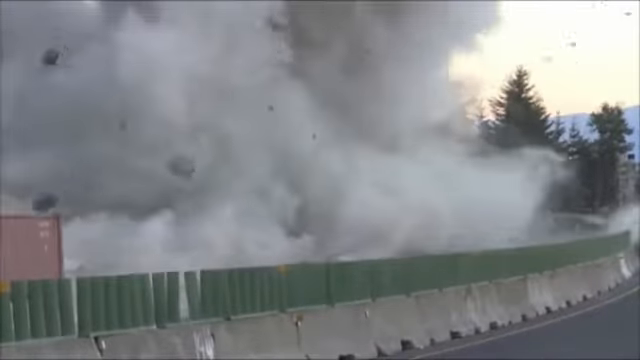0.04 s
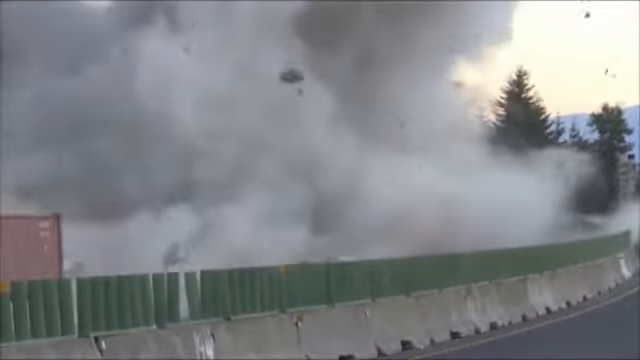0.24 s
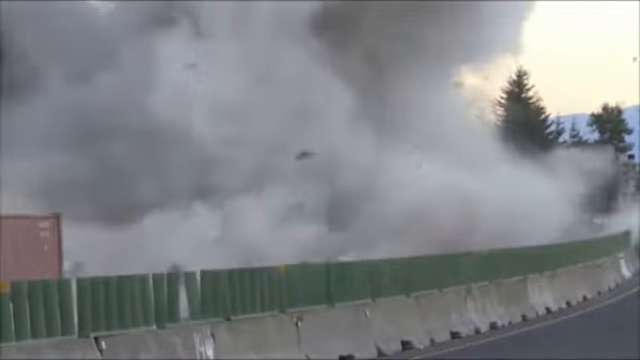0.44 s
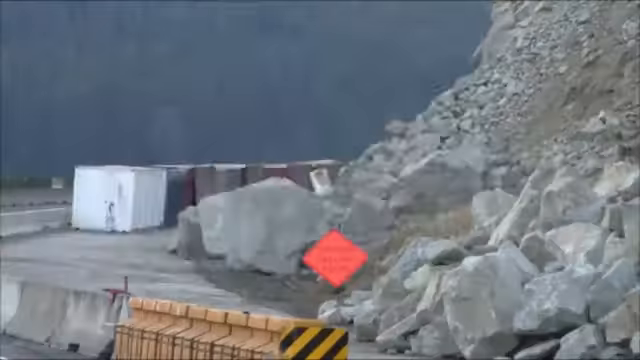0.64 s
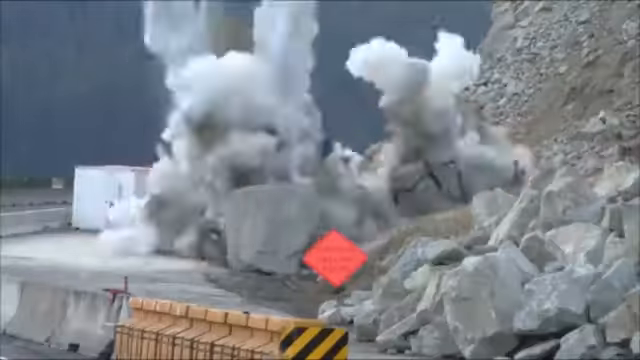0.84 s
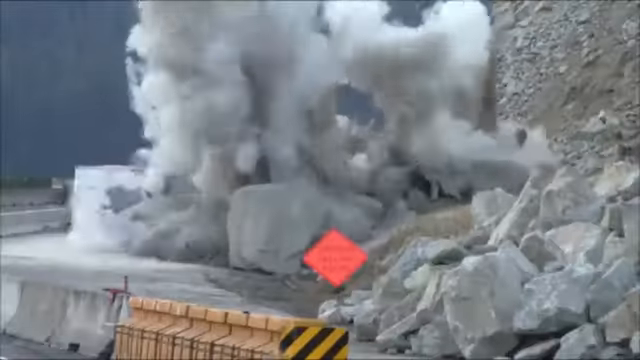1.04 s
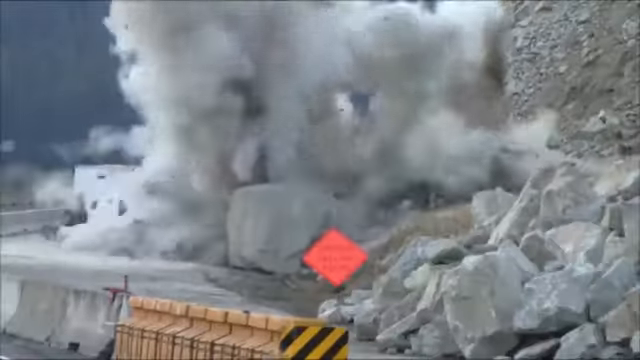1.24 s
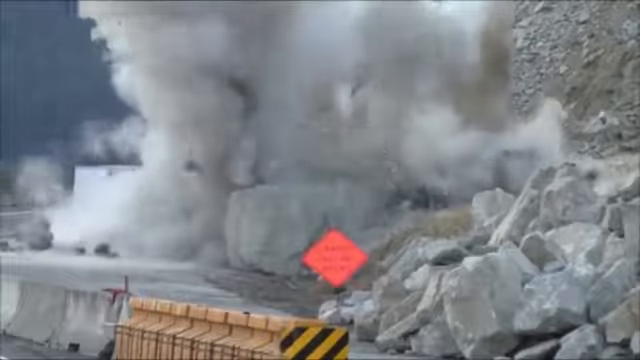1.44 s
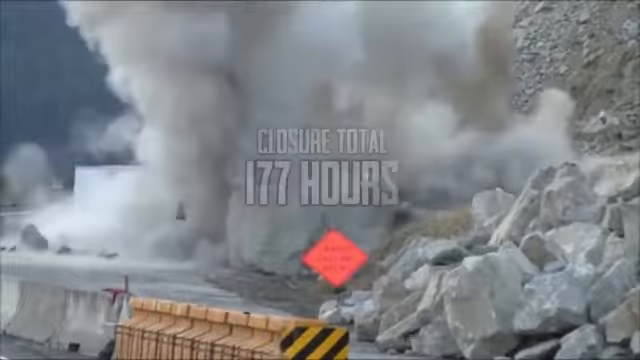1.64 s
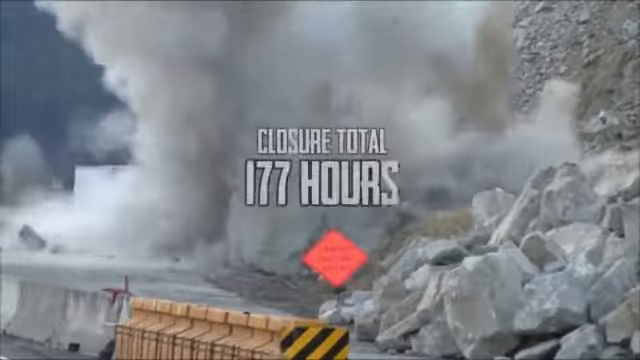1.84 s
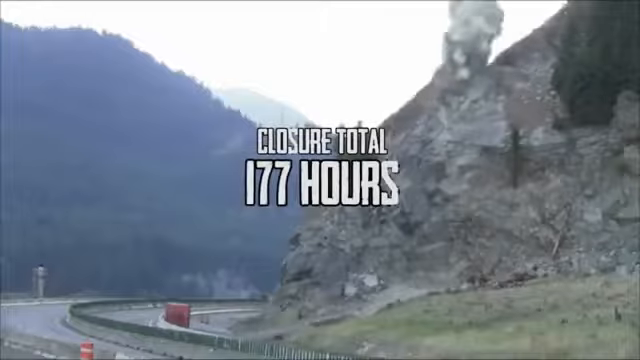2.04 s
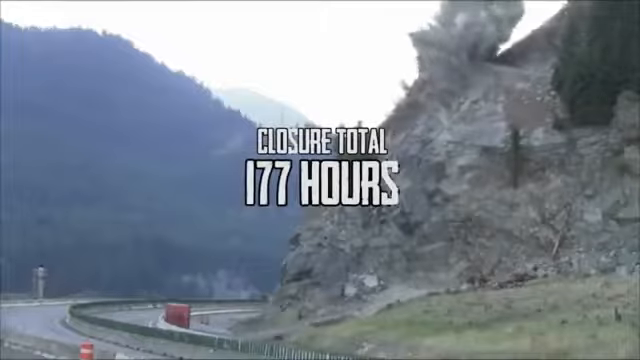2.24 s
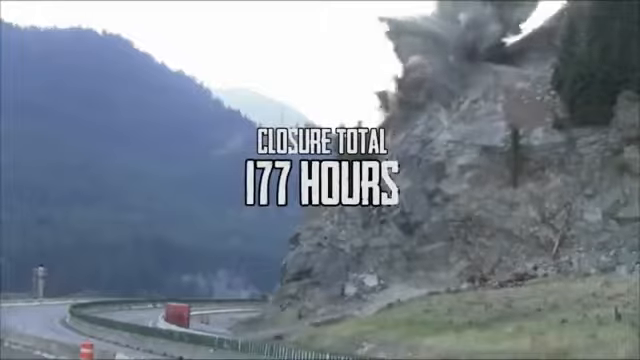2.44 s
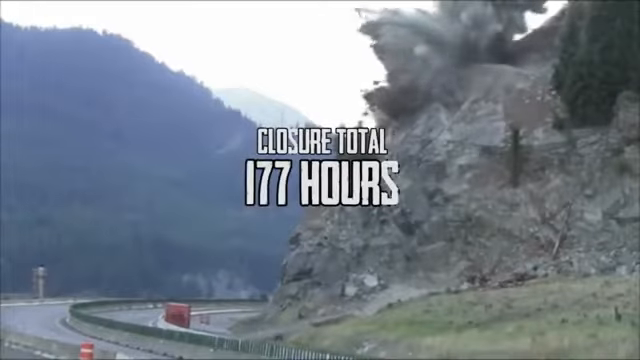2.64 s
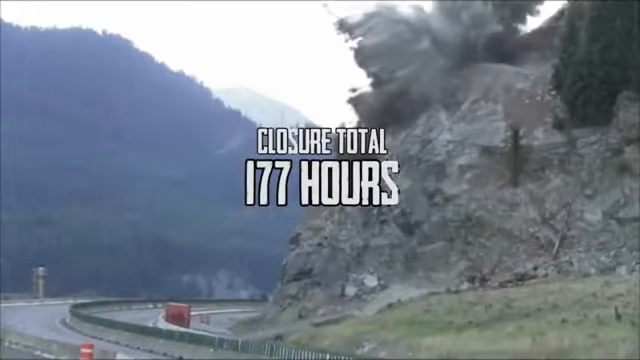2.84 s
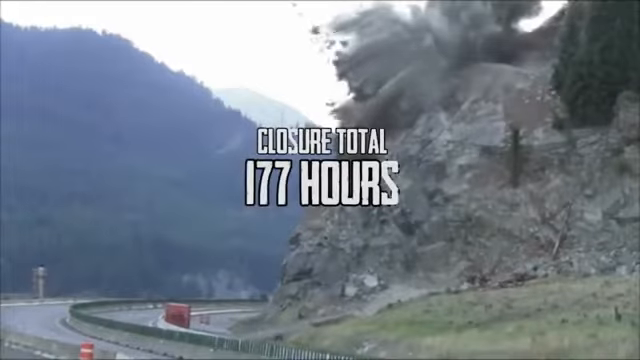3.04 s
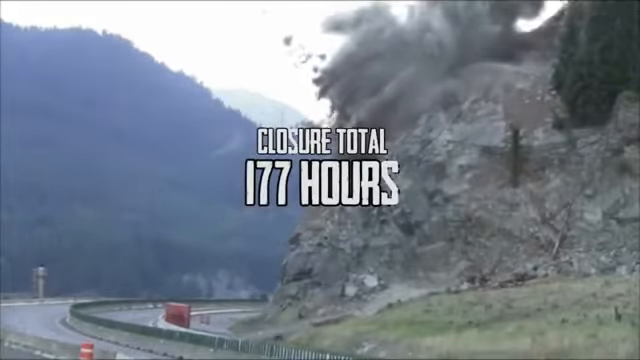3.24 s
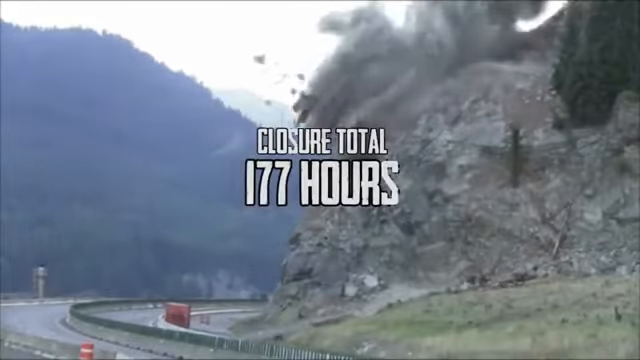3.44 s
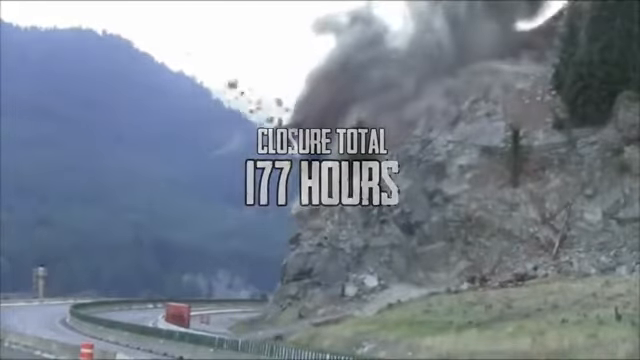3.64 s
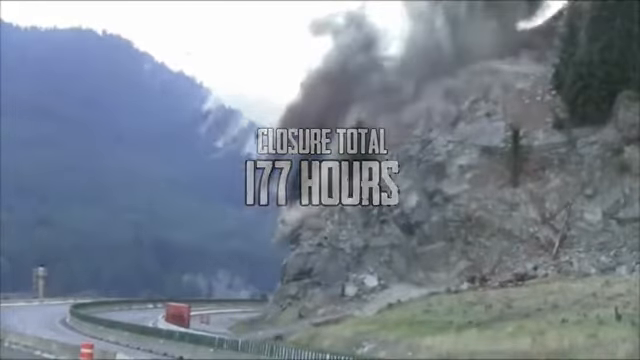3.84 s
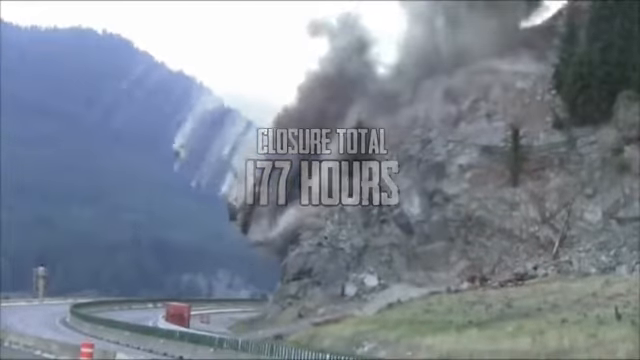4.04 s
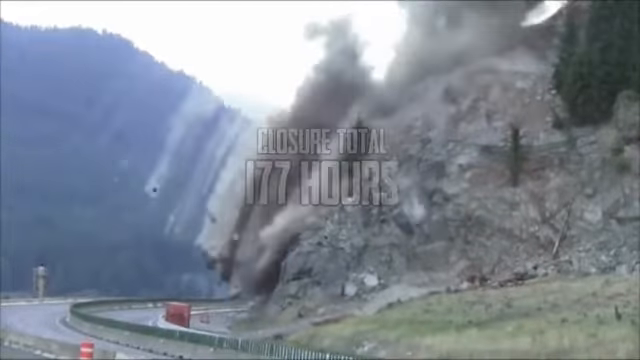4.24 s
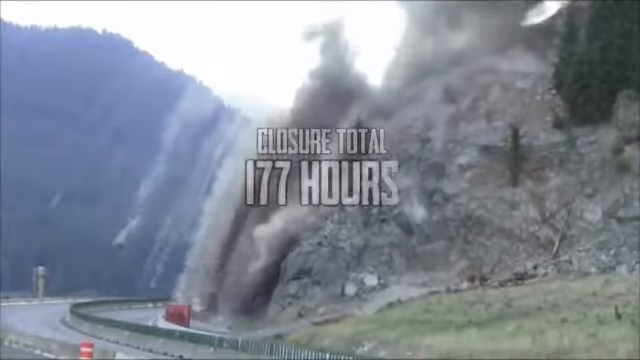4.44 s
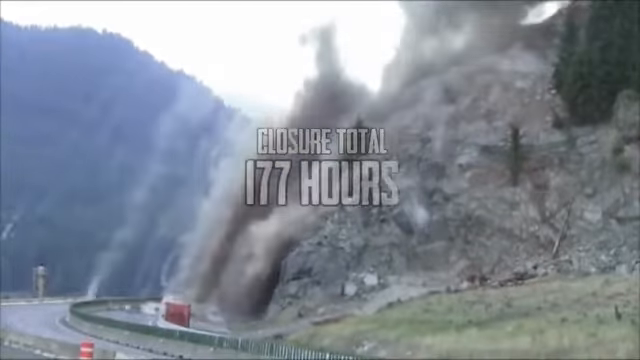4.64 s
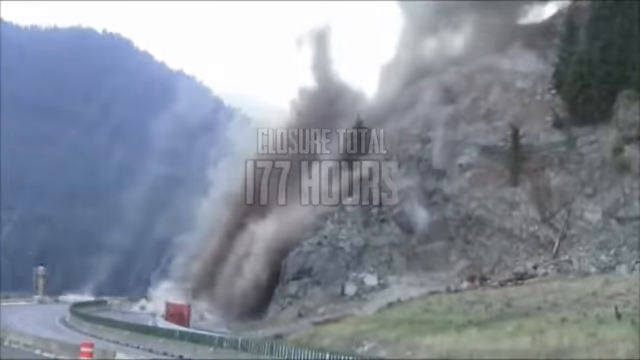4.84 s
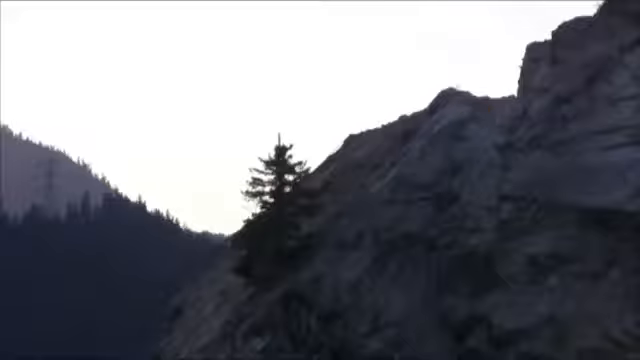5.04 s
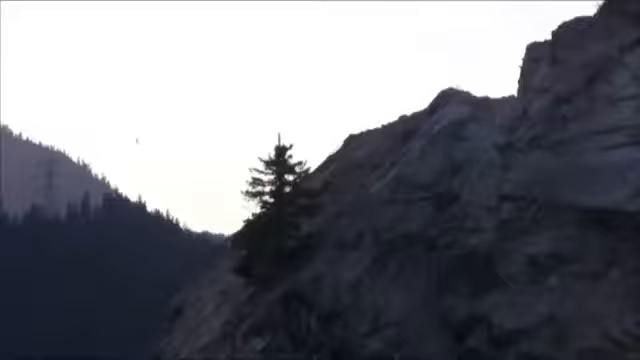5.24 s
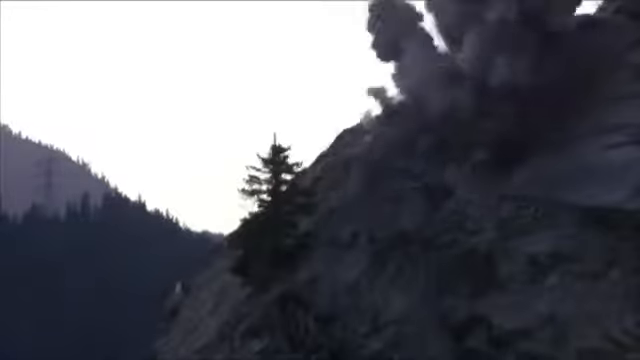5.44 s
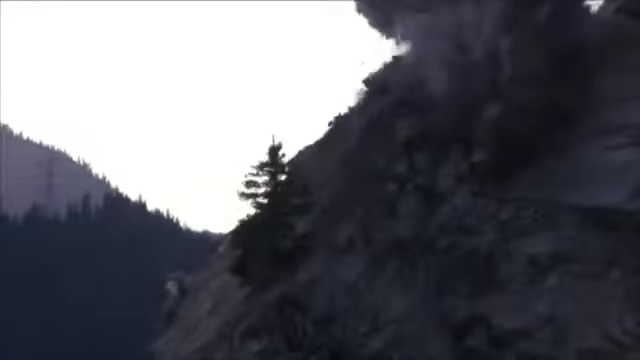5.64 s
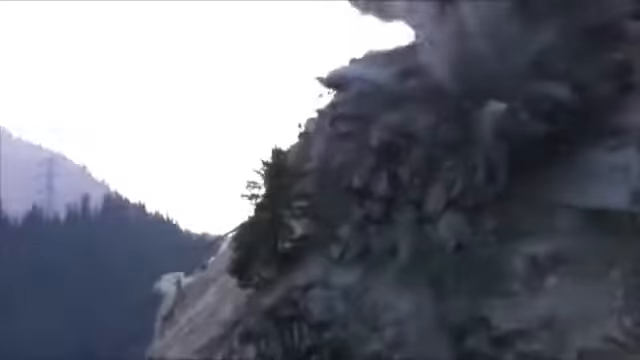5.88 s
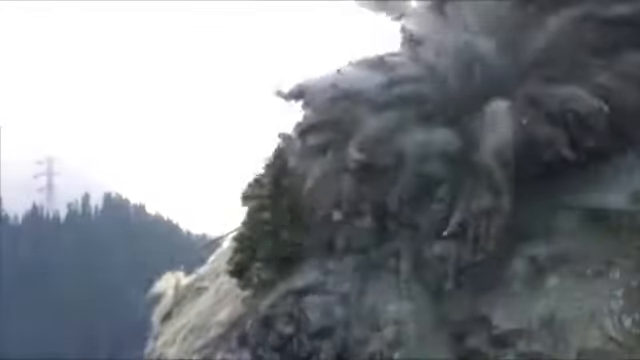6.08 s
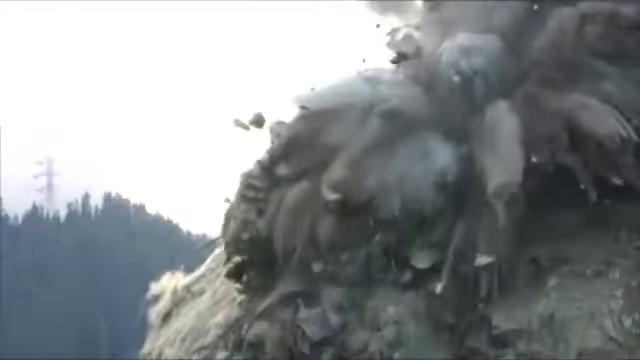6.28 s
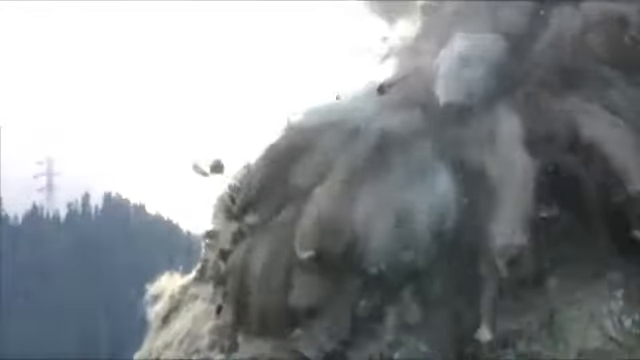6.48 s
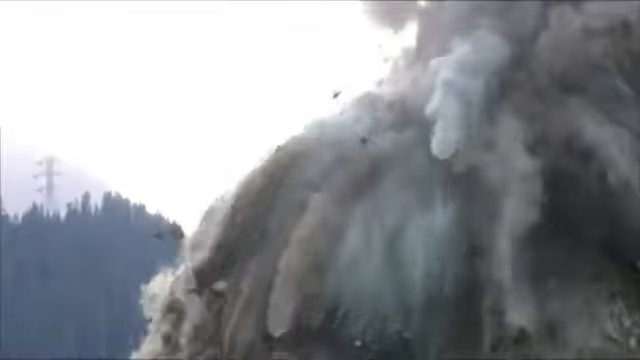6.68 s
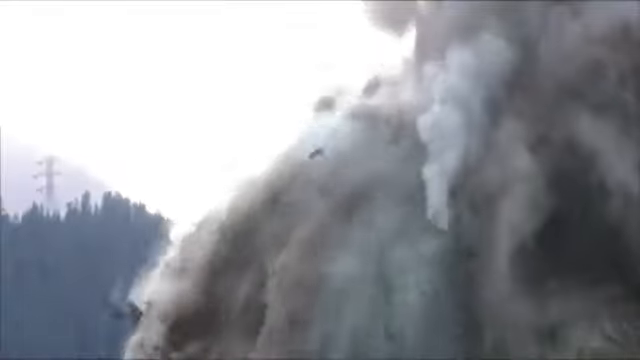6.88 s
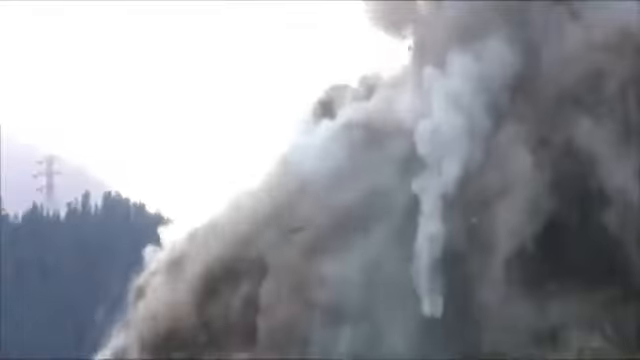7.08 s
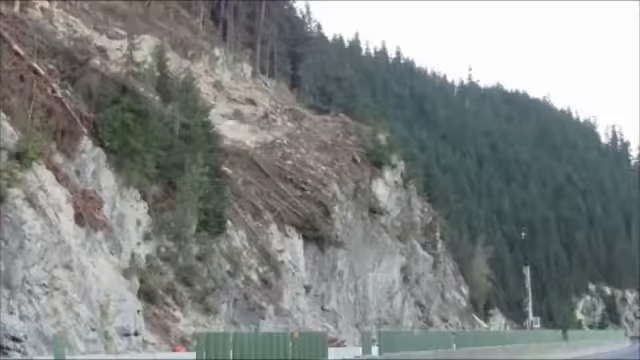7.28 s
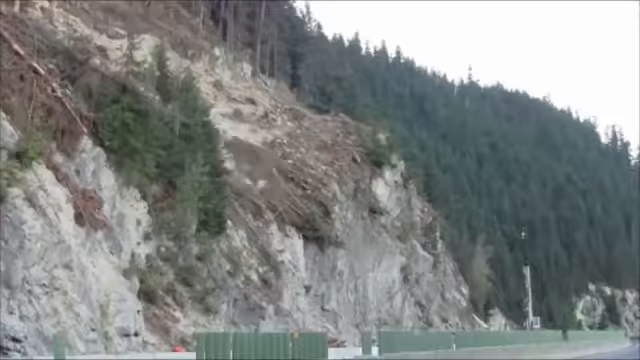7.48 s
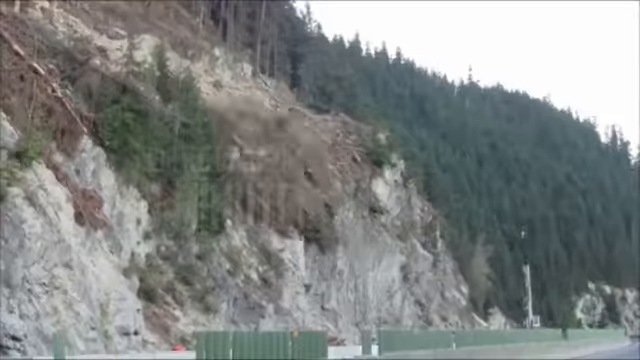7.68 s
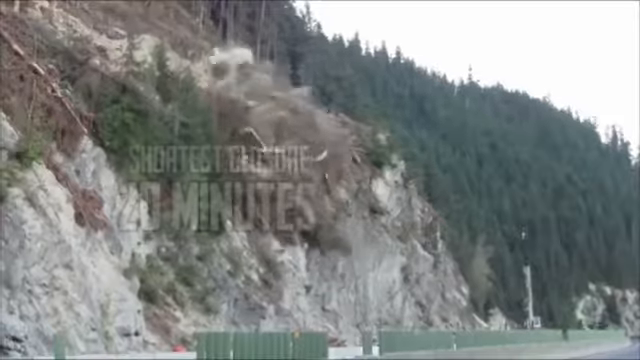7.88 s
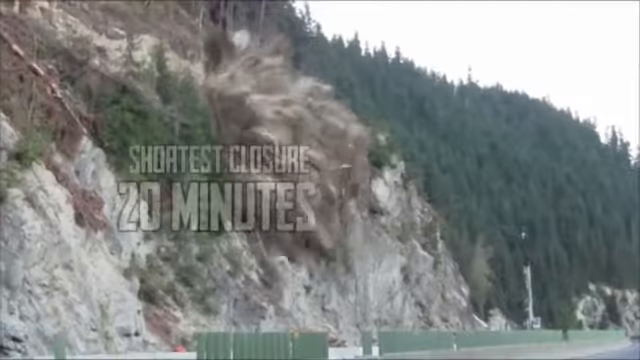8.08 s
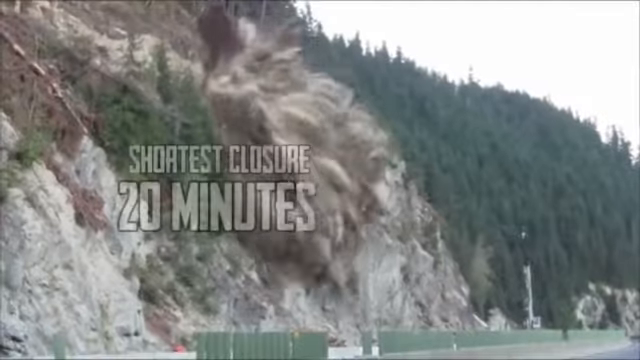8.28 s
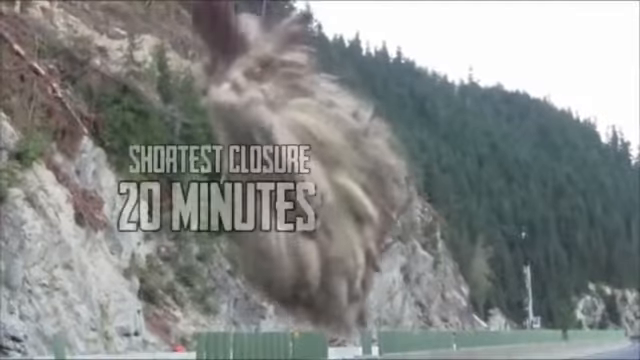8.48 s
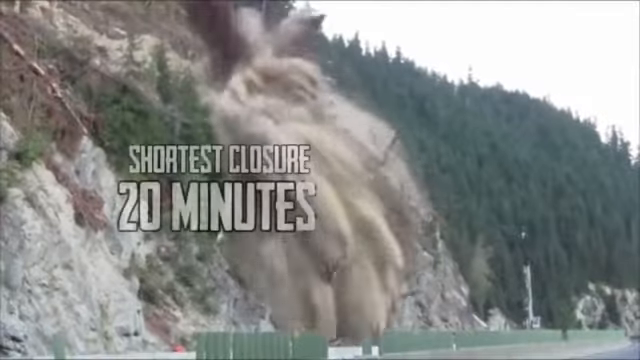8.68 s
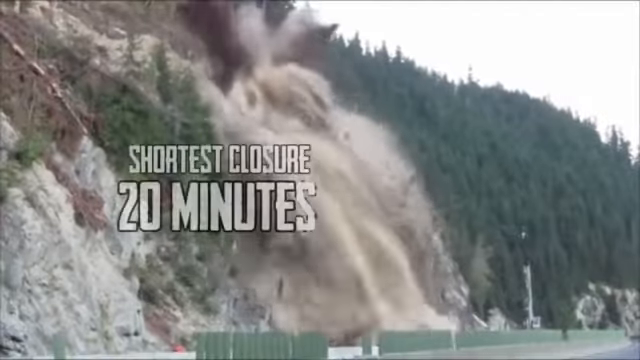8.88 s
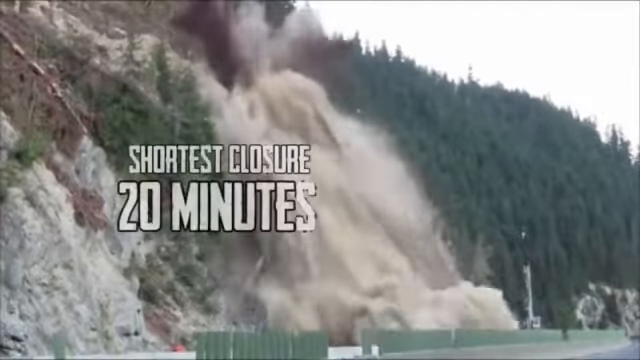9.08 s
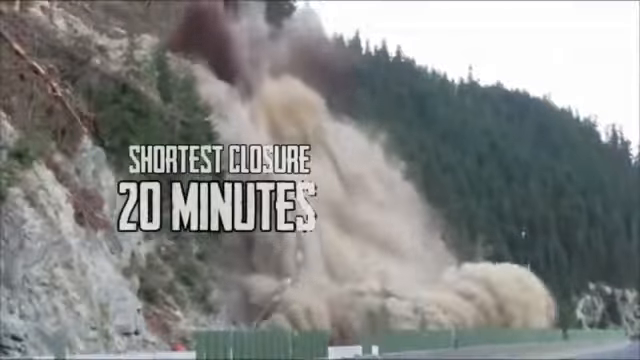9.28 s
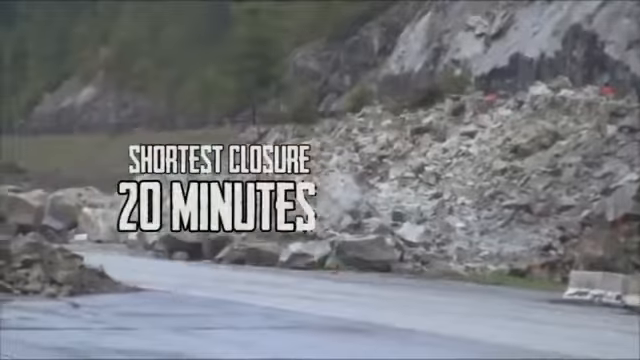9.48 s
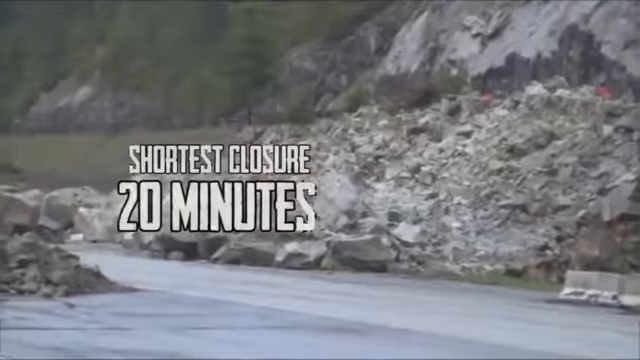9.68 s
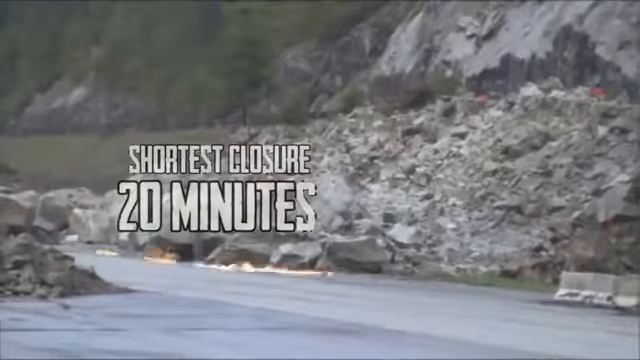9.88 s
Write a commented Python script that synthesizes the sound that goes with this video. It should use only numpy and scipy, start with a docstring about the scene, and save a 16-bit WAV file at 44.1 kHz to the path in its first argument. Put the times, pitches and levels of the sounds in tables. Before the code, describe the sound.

Rubble and gravel pour down from the start, with a few sharp stone hits. At 0.8 seconds hard cracks ring out, a boom follows at 1.1, and rocks tumble, fading by 2. A rapid row of detonator caps crackles from 2.1, running into booms and thuds from 2.5 to 2.8. Falling rock then swells, with lone knocks, until about 5.1. A brief lull holds a faint distant engine, leaves and one tiny high bird chirp. Caps crackle again at 5.4, the sharpest crack and a boom hit at 5.8, and boulders pour down until 7.2. Another row of caps runs from 7.35 to 7.7, followed by soft thuds and a growing gritty slide, with heavy dull blows around 9.2. The slide eases, and a last crack comes at 9.9. Everything is heard outdoors on a small stereo microphone with thin bass and rounded peaks.

```python
"""Rock blasts on highway slopes, cut one after another. Timed caps crack in quick rows and bounce off
the ground, the charges boom, then boulders, rocks, gravel and grit pour down in clumps and lone knocks.
Between blasts the valley is quiet but for a distant idling engine, leaves, a hum and a bird.
Heard in the open on a small stereo camera microphone that is thin in the bass and rounds the peaks."""
import sys
import numpy as np
from scipy import signal
from scipy.fft import rfft, irfft
from scipy.io import wavfile
from scipy.ndimage import uniform_filter1d

SR = 44100
rng = np.random.default_rng(int(sys.argv[2]) if len(sys.argv) > 2 else 0)


def digitize_waveform(pressure):
    """Quantize a signal to 16-bit integers and store it at the path in sys.argv[1].

    Rows of a 2-D input are taken as channels; values are limited to [-1, 1].
    """
    field = np.atleast_2d(pressure).T
    bounded = np.clip(field, -1, 1)
    quanta = np.round(bounded * 32767).astype(np.int16)
    wavfile.write(sys.argv[1], SR, quanta)


N = 437472

# Lone cracks of the blasts on the slope: start_s, level_db, pitch_hz, treble_db
CRACKS = [(.8036, -13, 2230, -25), (.8056, -1.5, 1830, -28), (.8115, -34, 5000, -6), (.8193, -5, 1970, -12),
          (.828, -23, 4000, -5), (.836, -16, 800, -30), (.926, -13, 3000, -27), (1.0338, -14, 2000, -27),
          (1.0395, -19, 3200, -20), (1.0353, -6, 2200, -37), (1.0375, -11, 2600, -33),
          (1.0497, -7, 1800, -33), (1.052, -17, 2200, -33), (1.089, -1.5, 1290, -12),
          (1.1025, -9, 1680, -12), (2.4708, -5, 1050, -10), (2.4743, -18, 1240, -19),
          (2.4783, -2, 980, -25), (2.5064, -6, 980, -26), (2.5824, -6, 1020, -16), (2.7312, -4.5, 900, -21),
          (2.7642, -10, 1080, -11), (5.7817, 5.5, 764, -17), (5.849, -10, 1200, -13),
          (9.9053, -3.5, 1510, -9)]


def blast_cracks():
    """Sharp pressure fronts that die within a cycle and reach the microphone without bass."""
    return shots(CRACKS, gain_db=3.5, turns=0.35, edge_db=-2.5, spit_s=0.00017,
                 scatter_db=-12.5, thin_hz=610)


# Timed caps on the slope, one a hole, fired along the rows: start_s, level_db, pitch_hz
CAPS = [(2.1083, -18.5, 850), (2.1235, -18, 850), (2.1359, -19, 980), (2.1492, -11, 930),
        (2.1625, -22, 800), (2.1739, -15.5, 950), (2.1885, -15, 1000), (2.2003, -18, 1380),
        (2.2123, -14, 900), (2.227, -18, 900), (2.2384, -17, 1270), (2.2482, -11, 1940),
        (2.2575, -13, 1660), (2.2632, -17, 1300), (2.268, -16, 1630), (2.2717, -9, 1650),
        (2.2798, -10.5, 2220), (2.284, -9, 2140), (2.2911, -10, 2780), (2.3038, -7, 2320),
        (2.3183, -12.5, 1500), (2.3299, -10, 1760), (2.3425, -12, 1500), (2.3538, -9.5, 1730),
        (2.3673, -10, 1880), (2.3778, -12, 1960), (2.3905, -26, 900), (2.403, -10, 1950),
        (2.4132, -16, 1300), (2.422, -21, 1770), (2.4272, -10, 1760), (2.4377, -10, 1670),
        (5.4422, -11.5, 2840), (5.4623, -2, 1970), (5.4693, -9, 1870), (5.4871, -14, 1700),
        (5.4952, -9, 1710), (5.5056, -11, 1690), (5.512, -11.5, 1820), (5.5246, -11, 1790),
        (5.5302, -9.5, 1620), (5.545, -22, 1500), (5.5505, -21, 1000), (5.563, -19, 1820),
        (5.571, -14, 1880), (5.583, -19, 1000), (5.589, -18, 1440), (5.6034, -13.5, 1400),
        (5.623, -21, 1200), (5.6285, -19, 1200), (5.6417, -15, 2170), (5.65, -15, 1000), (5.655, -24, 1100),
        (5.6614, -12, 1880), (5.668, -20, 1000), (5.676, -18, 1100), (5.6793, -12, 1960),
        (5.6965, -17, 1500), (5.6983, -12, 1710), (5.7058, -14, 1620), (5.7145, -12, 1900),
        (5.7255, -15, 1650), (5.7475, -19, 1400), (5.754, -18, 1000), (7.3499, -10.5, 2650),
        (7.3687, -16, 2560), (7.387, -18, 2690), (7.3913, -9, 2820), (7.407, -15, 1700),
        (7.4108, -9.5, 2030), (7.4239, -17, 2110), (7.431, -14.5, 2200), (7.4481, -13, 1700),
        (7.4648, -16, 1730), (7.4724, -12, 1780), (7.4875, -20, 1590), (7.4915, -15, 2000),
        (7.4951, -12.5, 2080), (7.5057, -17, 1620), (7.5135, -16, 2490), (7.5272, -15, 2090),
        (7.5323, -16, 2390), (7.5361, -10, 1900), (7.5447, -16, 2070), (7.555, -23, 1500),
        (7.5677, -13.5, 2390), (7.5739, -15, 1620), (7.5865, -19, 1960), (7.5909, -11.5, 2570),
        (7.5958, -19, 1960), (7.6083, -21, 1900), (7.6138, -20, 1900), (7.6239, -15, 2150),
        (7.635, -14, 2900), (7.6548, -15.5, 2510), (7.674, -15, 2410), (7.694, -12.5, 1900),
        (7.714, -11, 1660)]
# Hiss of a 2 kHz cap, one value a volley: treble_db
CAP_TREBLE_DB = [-10.5, -13, -8]
# Low edge of each volley: cutoff_hz
CAP_THIN_HZ = [550, 650, 780]


def volleys():
    """Three rows of caps; sharper caps spit more treble."""
    caps, out = np.array(CAPS), 0
    rows = np.split(caps, np.flatnonzero(np.diff(caps[:, 0]) > 1) + 1)
    for row, treble_db, thin_hz in zip(rows, CAP_TREBLE_DB, CAP_THIN_HZ):
        treble = treble_db + 7 * np.log2(row[:, 2] / 2000)  # 7 dB more per octave of pitch
        out = out + shots(np.c_[row, treble], gain_db=8.0, turns=0.41, edge_db=-6.5, spit_s=0.00057,
                          scatter_db=-11.5, thin_hz=thin_hz)
    return out


# Main charges in the rock: start_s, level_db, t60_s, length_s, treble_db
BOOMS = [(1.0879, -30, 0.048, .02, 21.5), (1.089, -26, 0.65, 0.06, 3), (2.468, -24, 0.27, .15, 6),
         (2.51, -28, 0.56, 0.078, 3), (2.586, -25, 0.83, 0.11, 0), (2.691, -32, 1.0, .085, -1),
         (5.777, -25.5, 0.46, .2, 3.5), (5.838, -29.5, 0.68, 0.21, 0), (9.904, -34, .05, .015, 20)]
# Colour of a boom in the six bands (boulders, rocks, rubble, gravel, grit, dust): gain_db
BOOM_COLOUR_DB = [-3.5, 1.5, -1.5, -13.5, -29.5, -30]
# Swells of the ground: middle_s, length_s, peak_db
RUMBLES = [(1.125, .1, -25), (4.978, 0.087, -21.5), (7.263, 0.082, -41), (7.83, 0.53, -45.5),
           (8.038, 0.18, -41.5), (9.2, 0.96, -36), (9.735, 0.99, -40)]


def boom_power():
    """Power in six bands: each charge starts at once and decays; the ground swells in the lowest band."""
    t, power = np.arange(N) / SR, np.zeros((6, N))
    for start_s, db, t60_s, length_s, treble_db in BOOMS:
        on, fading_db = during([(start_s, db), (start_s + length_s, db - 60 * length_s / t60_s)])
        colour_db = BOOM_COLOUR_DB + treble_db * np.array([0, 0, 0, 0.5, 1, 1.5])
        power[:, on] += undb(fading_db + colour_db[:, None]) ** 2
    for middle_s, length_s, db in RUMBLES:
        swell = np.cos(np.pi * np.clip((t - middle_s) / length_s, -.5, .5)) ** 2
        power[0] += (undb(db) * swell) ** 2
    return power


# Low, dull blows: thuds from the slope, and a quick run of 500 Hz pops from the charges at 2.68-2.77 s:
# start_s, level_db, pitch_hz
THUDS = [(.0385, -12, 500), (.053, -5.5, 500), (1.094, -17, 291), (2.469, -3, 297), (2.516, -6, 520),
         (2.682, -11, 500), (2.695, -3, 480), (2.705, -2.5, 520), (2.718, -6, 480), (2.731, -4, 450),
         (2.741, -12, 550), (2.754, -9, 520), (2.767, -8, 550), (4.971, -20, 195), (5.774, -32, 318),
         (7.258, -26, 164), (7.699, -20, 215), (7.729, -24, 110), (7.793, -23, 239), (7.874, -21, 260),
         (9.128, -6, 430), (9.208, -1, 390), (9.24, -6, 460), (9.252, -9, 480), (9.341, -5, 450)]


def thuds():
    """Dull blows that ring for a few cycles, with almost no hiss or scatter."""
    return shots([(*thud, -40) for thud in THUDS], gain_db=-7.5, turns=1.34, edge_db=0, spit_s=0.001,
                 scatter_db=-53, thin_hz=50.3)


# Rock pouring down, one list a fall: time_s, rubble_db, rocks_over_rubble_db, grit_over_rubble_db
ROCKFALLS = [
    [(0, -26, -0.5, -24), (.232, -24.5, -8.5, -21), (.288, -23.5, -9.5, -22.5), (.367, -28, -3.5, -22),
     (.58, -28, -2.5, -21), (.668, -30.5, -3.5, -19), (.762, -32, -2, -19)],
    [(1.14, -40, -1, -22), (1.228, -26, 5, -30), (1.29, -28.5, 4, -35), (1.358, -26.5, 4.5, -31),
     (1.477, -33.5, 3.5, -47), (1.542, -31, 4, -46), (1.695, -34.5, -2, -61), (1.871, -38.5, 2.5, -53),
     (1.997, -37.5, 5, -38)],
    [(2.77, -39.5, 2.5, -25), (3.002, -43, 1.5, -36), (3.422, -34.5, 4, -25.5), (3.495, -34, 0.5, -25.5),
     (3.877, -29.5, 0.5, -23), (4.16, -29.5, 0, -20.5), (4.232, -27.5, -3.5, -20), (4.518, -31, -1, -23),
     (4.63, -24.5, -6, -24), (4.712, -28, -3.5, -18.5), (4.912, -25.5, -3.5, -21.5),
     (4.962, -24.5, -4.5, -19), (5.1, -25.5, 2, -22)],
    [(5.8, -47, -11, -19), (5.95, -29.5, 2.5, -23), (6.206, -30.5, -0.5, -31), (6.4, -29, 2.5, -30.5),
     (6.52, -29.5, 1.5, -26.5), (6.892, -24, 0.5, -25), (7.05, -24.5, 0.5, -26), (7.202, -27, -2, -25)],
    [(7.72, -40.5, -20, -22), (7.958, -41.5, -18, -26.5), (8.126, -38, -9.5, -18.5), (8.501, -30, -9, -21),
     (8.609, -30, -7, -18.5), (8.857, -28, -7, -18), (9.212, -27, 3, -17.5), (9.307, -27, -4, -22),
     (9.5, -29, 1.5, -21), (9.57, -31.5, -0.5, -22.5)],
    [(9.57, -37, -3.5, -32), (9.874, -37.5, -5, -33.5), (9.92, -43, -3, -19)],
]
# Finest dust in each fall: dust_over_grit_db
DUST_DB = [-2.5, -5, -9.5, -9.5, -1.5, 9]
# The roar dips right after the sharpest stones: start_s, gain_db
DIPS = [(0.291, -9), (0.579, -6), (9.499, -4.5)]
DIP_S = 0.067
# Base level of the boulders and of the gravel in each fall: over_rubble_db
BOULDERS_DB, GRAVEL_DB = [-10.5, -9, -10, -15.5, -7, -13], [-3.5, -5, -4.5, -5.5, -3.5, -7]


def rockfall_power():
    """Power of falling stone in six bands; boulders rise with the rocks, gravel and dust with the grit."""
    t, power = np.arange(N) / SR, np.zeros((6, N))
    dip_db = sum(db * (t >= s) * np.clip(1 - (t - s) / DIP_S, 0, 1) for s, db in DIPS)
    for rows, boulders_db, gravel_db, dust_db in zip(ROCKFALLS, BOULDERS_DB, GRAVEL_DB, DUST_DB):
        on, rubble_db, rocks_db, grit_db = during(rows)
        colour_db = [boulders_db + 0.8 * rocks_db, rocks_db, np.zeros(len(on)),
                     gravel_db + 0.2742 * grit_db, grit_db, grit_db + dust_db]
        power[:, on] += undb(rubble_db + dip_db[on] + colour_db) ** 2
    return power


# Spectrum of tumbling rock at the microphone: frequency_hz, level_db
ROCK_SPECTRUM = [(18, -66), (30, -9), (59, -23.5), (147, -6), (337, -1), (384, -2.5), (815, -6),
                 (928, -9.5), (2490, -13), (3200, -17.5), (4500, -13), (5440, -17), (13500, -45),
                 (14200, -42), (14500, -85)]
# Borders between the six stone sizes, boulders to dust: frequency_hz
SIZE_BORDERS_HZ = [420, 1000, 3000, 7000, 11000]
# Lone knocks in each size: over_rush_db
KNOCK_DB = [-10, -3.5, -8.5, -3.5, -22, -18]
# Stereo spread of the sound, nearly mono low down and wider in the treble: frequency_hz, side_gain_db
WIDTH = [(60, -24), (110, -45), (200, -37), (380, -37), (700, -33.5), (1290, -32.5), (2370, -28.5),
         (4380, -25.5), (8080, -16), (14900, -13.5)]


def roar(band_power):
    """Dense impacts in clumps, plus lone knocks, split by stone size; each band follows its given power."""
    levels_db = 10 * np.log10(band_power)
    clumps = undb(0.5 * walk(30) + 0.92 * walk(110))
    rush = rfft(unit(clumps * rng.standard_normal((2, N))))
    chance, size = rng.random((2, N))
    # 260 knocks a second: many small stones, a few large
    knocks = (chance < 260 / SR) * undb(np.minimum(-4.5 * np.log(size), 16))
    shatter = np.exp(-np.arange(900) / SR / 0.0019)  # each breaks into a few milliseconds of clatter
    knocks = signal.fftconvolve(knocks, shatter)[:N] * rng.standard_normal(N)
    falling = np.clip((levels_db[1] + 39.5) / 9, 0, 1)  # a quiet valley holds no falling stones
    knocks = rfft(unit(clumps * knocks) * falling)
    octave = np.log2(np.arange(N // 2 + 1) * SR / N + 1)
    ramps = [np.clip((octave - np.log2(hz)) / 1.2 + .5, 0, 1) for hz in SIZE_BORDERS_HZ]
    above = [1] + [np.sin(np.pi / 2 * ramp) ** 2 for ramp in ramps] + [0]
    width = [np.ones(N // 2 + 1), shape(WIDTH)]
    out = 0
    for k, db in enumerate(levels_db):
        band = np.sqrt(above[k] - above[k + 1]) * shape(ROCK_SPECTRUM)
        mid, side = irfft(band * (rush + undb(KNOCK_DB[k]) * knocks) * width, N)
        out = out + undb(db + 0.41 * walk(18)) * np.array([mid, side]) / np.sqrt(np.mean(mid ** 2))
    return out


# Single stones that stand out of the fall: start_s, level_db, pitch_hz
STONES = [(0.2898, -12, 3600), (0.5796, -9, 3620), (0.7282, -17, 1180), (3.954, -12.5, 1260),
          (4.0076, -12, 2080), (4.041, -14, 960), (4.218, -12.5, 810), (4.4127, -16, 2270),
          (4.616, -13.5, 650), (4.669, -8, 1960), (4.693, -7, 780), (4.755, -10.5, 650),
          (4.8484, -10.5, 800), (4.868, -11.5, 730), (5.048, -14, 781), (5.9275, -13, 1260),
          (6.126, -17, 723), (6.697, -11.5, 600), (6.759, -17, 1020), (6.842, -14, 886), (6.886, -8, 813),
          (6.892, -8, 813), (6.935, -9, 900), (7.178, -7.5, 767), (8.033, -22.5, 675), (8.191, -22.5, 2130),
          (8.296, -18, 2140), (8.3635, -25, 1100), (8.56, -18.5, 700), (8.631, -23, 746), (8.79, -15, 2400),
          (9.4319, -16, 596), (9.481, -14, 1140), (9.4978, -13, 690), (9.548, -16, 804)]


def stones():
    """Each stone strikes with a short pitched knock and a little hiss."""
    return shots([(*stone, -24) for stone in STONES], gain_db=4.5, turns=0.8, edge_db=5, spit_s=0.0005,
                 scatter_db=-8.5, thin_hz=206)


def pressure_pulse(hz, turns, treble_db, spit_s):
    """A pressure dip and kick that rings out within a few turns; its sharp front spits a short hiss."""
    t = np.arange(1200) / SR
    wave = -np.sin(2 * np.pi * hz * t) * np.exp(-hz * t / turns)
    wave = filtered(wave, 2, min(3.7 * hz, TOP_HZ), "low")  # the air rounds the front
    front = int(SR / hz / 4)
    burst = rng.standard_normal(len(t)) * np.exp(-t / spit_s)
    spit = filtered(burst, 2, [2600, 9000], "band")
    wave[front:] += undb(treble_db) * spit[:len(t) - front] / np.abs(spit).max()
    return wave


# Ground between each blast and the microphone, and last the stereo spread of the sound from then on:
# start_s, bounce_delay_s, bounce_db, scatter_db, scatter_t60_s, side_gain_db
SITES = [(0, 0.0014, -29, -3, 0.0091, 7), (0.759, 0.0013, -2.5, 2, 0.0044, 12.5),
         (2, 0.0019, -2, -11, 0.0066, 11.5), (2.46, 0.0019, -5, -8.5, 0.018, 10),
         (5.1, 0.0012, -9, -17, 0.027, 10), (7.2, 0.00078, -5.5, -2.5, 0.013, 9),
         (9.57, 0.001, -7, 3, 0.011, 19.5)]
# Distance dulls the cracks at each site: cutoff_hz
DISTANCE_HZ = [13000, 9000, 8250, 11200, 10300, 15500, 14000]
GROUND_HZ = 4500  # soil and slope hand back little above this


def shots(events, gain_db, turns, edge_db, spit_s, scatter_db, thin_hz):
    """Each pulse arrives straight, again off the ground, then scattered by the slope; as mid and side."""
    out, t = np.zeros((2, N + 4000)), np.arange(2400) / SR
    for start_s, db, hz, treble_db in events:
        here = sum(site[0] <= start_s for site in SITES) - 1
        _, delay_s, bounce_db, tail_db, t60_s, _ = SITES[here]
        wave = pressure_pulse(hz, turns, treble_db + edge_db, spit_s)
        wave = filtered(wave, 2, DISTANCE_HZ[here], "low")
        path = undb(tail_db + scatter_db) * rng.standard_normal((2, len(t))) * undb(-60 * t / t60_s)
        path[0, int(delay_s * SR)] += undb(bounce_db)
        path = filtered(path, 1, GROUND_HZ, "low")
        path[0, 0] = 1  # the straight path
        at = int((start_s - .5 / hz) * SR)
        arrival = signal.fftconvolve(path, wave[None])
        out[:, at:at + arrival.shape[1]] += undb(db + gain_db) * arrival
    out = out[:, :N]
    out[1] = irfft(rfft(out[1]) * shape(WIDTH), N)
    return filtered(out, 3, thin_hz, "high")  # small sources radiate no bass


# Clatter off the slopes, one list a stretch: time_s, level_db, rocks_band_db
# The stretch at 5.1 s is the roar of the rockfall before it dying quickly away.
CLATTER = [
    [(.803, -27.5, -4), (.856, -40, -13), (.912, -31, -6), (1.012, -36.5, -12), (1.05, -28, -3.5),
     (1.068, -32, -4), (1.07, -39, -10), (1.087, -41, -14)],
    [(2.106, -47, -4), (2.215, -32.5, -5), (2.264, -29, -1), (2.338, -35.5, -20), (2.44, -36, -11),
     (2.442, -43, -2), (2.469, -48, -6)],
    [(5.1, -46, -14), (5.136, -73, 0)],
    [(5.443, -44, -15), (5.534, -37, -7), (5.691, -34.5, -3.5), (5.779, -36.5, -11)],
    [(7.35, -39, -31), (7.492, -36.5, -16), (7.53, -34, -16), (7.631, -38.5, -21), (7.72, -39, -26)],
]
# Its boulder, gravel, grit and dust bands: gain_db
CLATTER_COLOUR_DB = [-42, -10.5, -32, -33.5]


def clatter_power():
    """Power in six bands as the slopes throw back each volley as a thin clatter."""
    power = np.zeros((6, N))
    for rows in CLATTER:
        on, db, rocks_db = during(rows)
        bands_db = db + np.insert(CLATTER_COLOUR_DB, 1, [0, 0])[:, None]
        bands_db[1] += rocks_db
        power[:, on] += undb(bands_db) ** 2
    return power


# Harmonics of an engine far from the microphone: multiple, level_db
IDLE_HARMONICS = [(3, -10), (4, 0), (5, 8), (6, 8), (8, 13.5), (9, 12), (10, 7)]
IDLE_HZ, IDLE_DB, IDLE_S = 49, -63.5, (5.1, 5.5)


def engine():
    """A distant engine idles before one blast, its speed and harmonics wavering."""
    phase = 2 * np.pi * np.cumsum(IDLE_HZ * (1 + 0.0087 * walk(12))) / SR
    idle = sum(undb(db + 3.4 * walk(25)) * np.sin(k * phase + rng.uniform(0, 2 * np.pi))
               for k, db in IDLE_HARMONICS)
    return undb(IDLE_DB) * idle * span(*IDLE_S)


# A faint hum in the valley: time_s, pitch_hz, level_db
HUM = [(1.997, 157, -61), (2.3, 150.4, -62), (2.45, 158, -90)]


def hum():
    """One low tone wavers and fades before a blast."""
    hz, db = curve(HUM)
    return np.sqrt(2) * undb(db + 1.3 * walk(31.5)) * tone(hz) * span(HUM[0][0], HUM[-1][0])


# A bird among the trees: time_s, pitch_hz, level_db
CHIRP = [(5.16, 8454, -65), (5.18, 8700, -41), (5.2, 9000, -65)]
UPPER_VOICE = [(5.163, 10300), (5.197, 11600)]  # time_s, pitch_hz


def bird():
    """One thin rising chirp with a second voice that climbs faster; the trees hand it back briefly."""
    hz, db = curve(CHIRP)
    upper_hz, = curve(UPPER_VOICE)
    chirp = undb(db) * (tone(hz) + undb(-12) * tone(upper_hz)) * span(CHIRP[0][0], CHIRP[-1][0])
    t = np.arange(6000) / SR
    trees = undb(-40) * rng.standard_normal((2, len(t))) * undb(-60 * t / 0.18)
    trees[0, 0] = 1.2  # the straight path
    return signal.fftconvolve(chirp[None], trees)[:, :N]


def breeze():
    """Leaves hush all around while the engine idles, falling off toward the treble."""
    hush = irfft(rfft(rng.standard_normal(N)) * shape(ROCK_SPECTRUM), N)
    return undb(-53) * unit(filtered(hush, 2, [500, 5000], "band")) * span(*IDLE_S)


# Valley air in the six bands: level_db
AIR_COLOUR_DB = [-57, -56, -57, -69.5, -77, -79.5]
# Its rise and fall: time_s, gain_db
AIR_DRIFT = [(.78, 1.5), (2, -2), (5.2, -2), (7.2, -0.5), (7.348, -5.5)]


def air_power():
    """Power in six bands of the quiet air under everything."""
    return np.outer(undb(AIR_COLOUR_DB), undb(curve(AIR_DRIFT)[0])) ** 2


def undb(db):
    """Decibels to amplitude."""
    return 10 ** (np.asarray(db) / 20)


def unit(x):
    """Scale to an RMS of 1."""
    return x / np.sqrt(np.mean(x ** 2))


def tone(hz):
    """A sine that follows a pitch curve."""
    return np.sin(2 * np.pi * np.cumsum(hz) / SR)


def filtered(x, order, hz, kind):
    """A Butterworth filter."""
    return signal.sosfilt(signal.butter(order, hz, kind, fs=SR, output="sos"), x)


def shape(table):
    """dB points joined on a log-frequency axis, as gains for an rfft."""
    hz, db = np.transpose(table)
    return undb(np.interp(np.log(np.arange(N // 2 + 1) * SR / N + 1), np.log(hz), db))


def curve(rows):
    """Each column joined over time, across the whole scene."""
    s, *columns = np.transpose(rows)
    return [np.interp(np.arange(N) / SR, s, c) for c in columns]


def during(rows):
    """The samples that a curve covers, and its columns there."""
    s, *columns = np.transpose(rows)
    on = np.arange(int(s[0] * SR), min(int(s[-1] * SR), N))
    return on, *(np.interp(on / SR, s, c) for c in columns)


def walk(rate):
    """Random levels held 1 / rate s and slewed; spread near 1."""
    hold = int(SR / rate)
    steps = np.repeat(rng.standard_normal(N // hold + 1), hold)
    return unit(uniform_filter1d(steps, hold)[:N])


def span(start_s, end_s):
    """A gate with short fades."""
    t = np.arange(N) / SR
    return np.clip(np.minimum(t - start_s, end_s - t) / 0.0046, 0, 1)


# Deep bass that reaches the microphone: start_s, gain_db
DEEP_BASS = [(0, -23), (.759, -13), (2, 7), (2.46, 0), (5.1, 6), (7.2, 1), (8.6, -24), (9.57, 6.5)]
DEEP_HZ = 140
# Low-middle weight of each site: gain_db and centre_hz
BODY_DB, BODY_HZ = [3, -2.5, 0.5, -4.5, -7.5, -1, -4], [442, 333, 330, 307, 390, 314, 337]
NARROW_HZ, NARROW_S = 4730, 0.747  # the two channels are alike below this pitch, until this time


def scene():
    """All sources as left and right; the stereo spread and bass weight vary from blast to blast."""
    t = np.arange(N) / SR
    band_power = boom_power() + rockfall_power() + clatter_power() + air_power()
    mid, side = blast_cracks() + stones() + thuds() + roar(band_power) + volleys() + bird()
    mid = mid + engine() + hum()
    site_s, side_db = np.transpose(SITES)[[0, -1]]
    here = np.searchsorted(site_s, t, "right") - 1
    side = np.where(t < NARROW_S, filtered(side, 3, NARROW_HZ, "high"), side)
    side = side * undb(side_db)[here] + breeze()
    deep_s, deep_db = np.transpose(DEEP_BASS)
    deep_gain = undb(deep_db)[np.searchsorted(deep_s, t, "right") - 1]
    mid = mid + (deep_gain - 1) * filtered(mid, 1, DEEP_HZ, "low")
    body = [signal.lfilter(*signal.iirpeak(hz, 1.3, fs=SR), mid) for hz in BODY_HZ]
    mid = mid + (undb(BODY_DB)[here] - 1) * np.choose(here, body)
    return np.array([mid + side, mid - side])


CEILING, BASS_HZ, TOP_HZ = 0.43, 64, 15500


def record(dry):
    """The camera's input stage rounds the loudest peaks, thins the deep bass and cuts the top."""
    soft = CEILING * np.tanh(dry / CEILING)
    thin = filtered(soft, 2, BASS_HZ, "high")
    return signal.sosfilt(signal.ellip(8, .2, 60, TOP_HZ, fs=SR, output="sos"), thin)


dry = scene()
out = record(dry)
digitize_waveform(out)
```